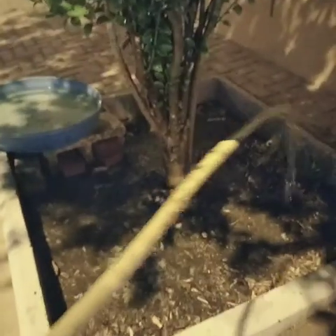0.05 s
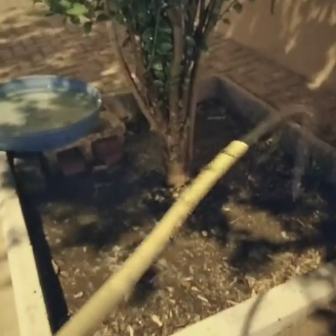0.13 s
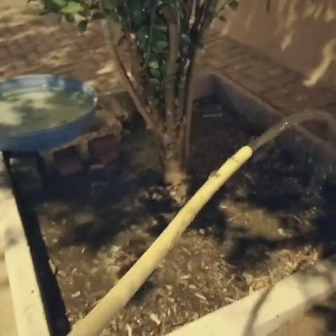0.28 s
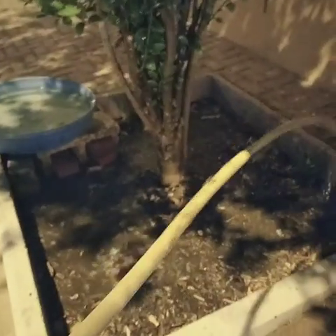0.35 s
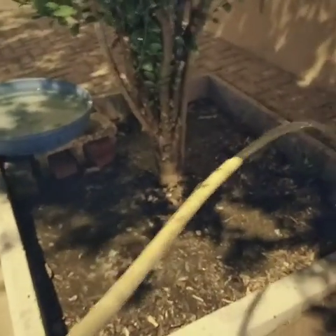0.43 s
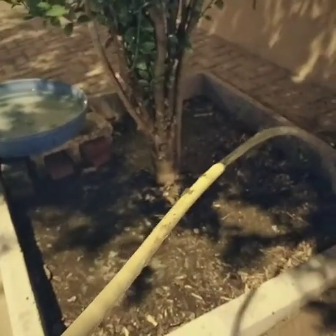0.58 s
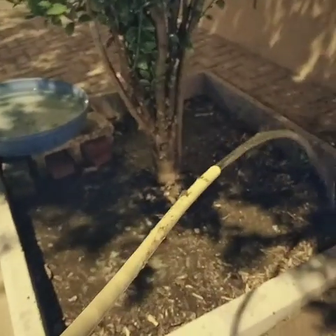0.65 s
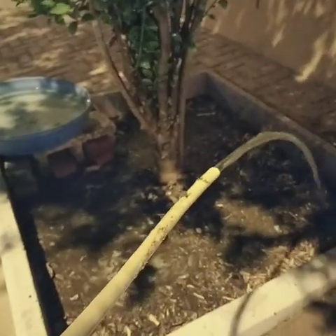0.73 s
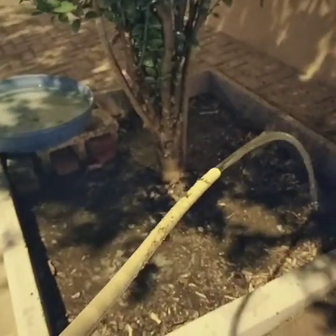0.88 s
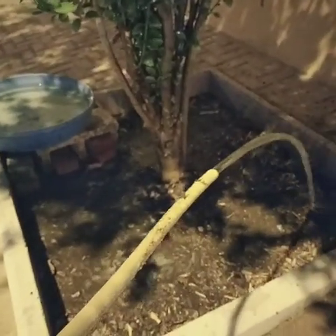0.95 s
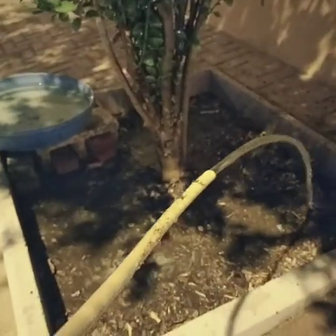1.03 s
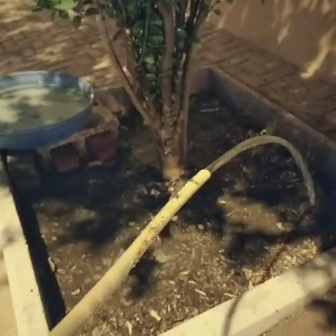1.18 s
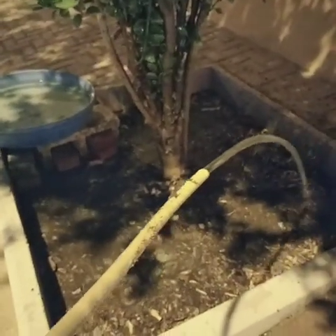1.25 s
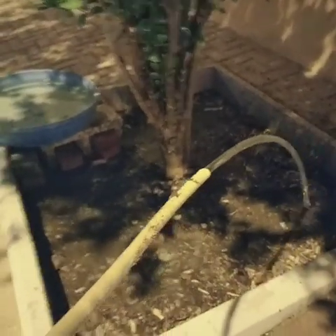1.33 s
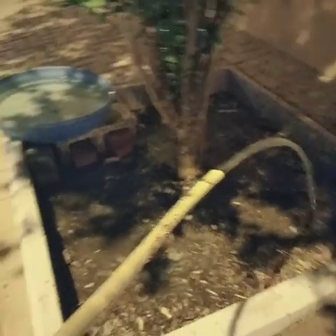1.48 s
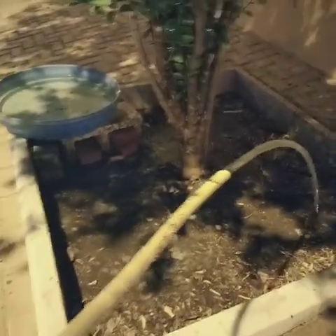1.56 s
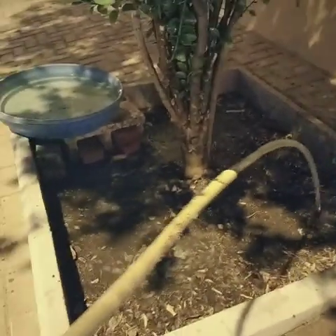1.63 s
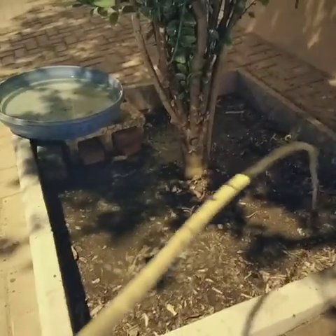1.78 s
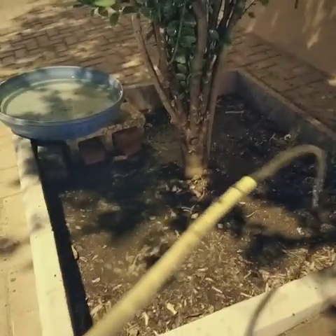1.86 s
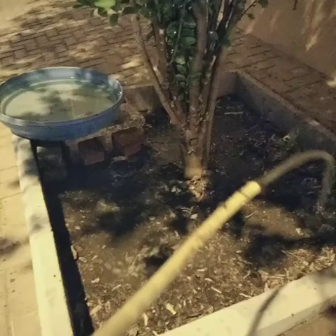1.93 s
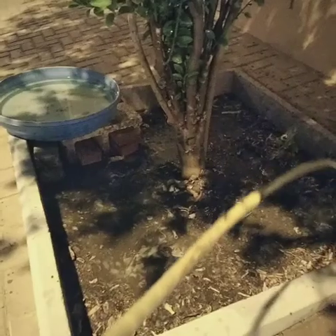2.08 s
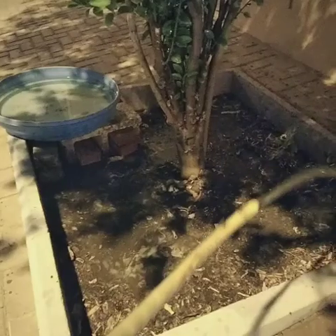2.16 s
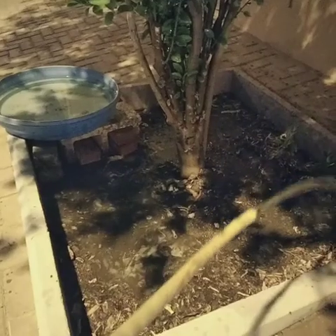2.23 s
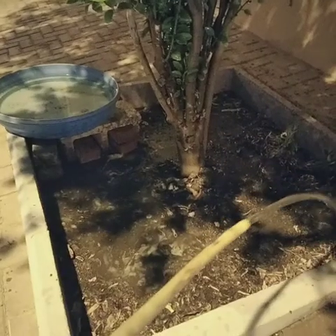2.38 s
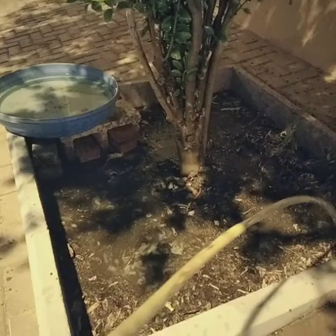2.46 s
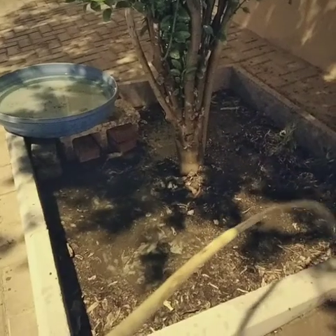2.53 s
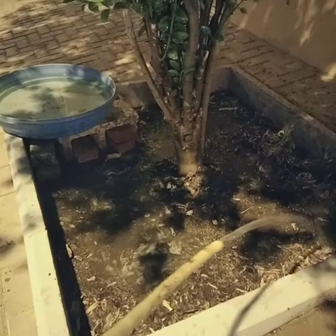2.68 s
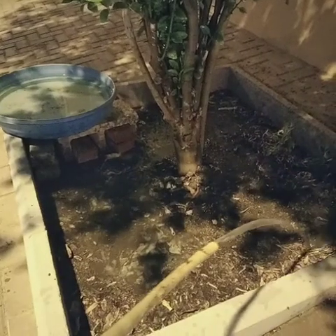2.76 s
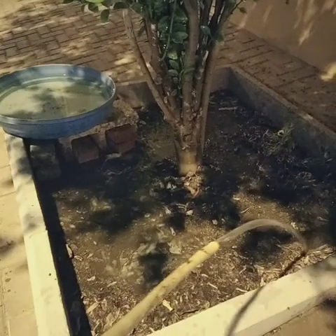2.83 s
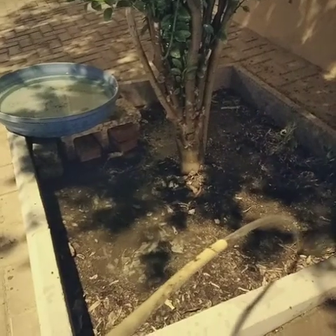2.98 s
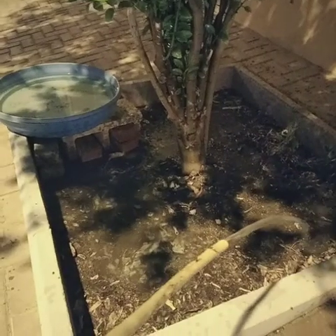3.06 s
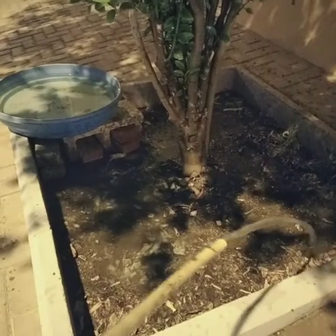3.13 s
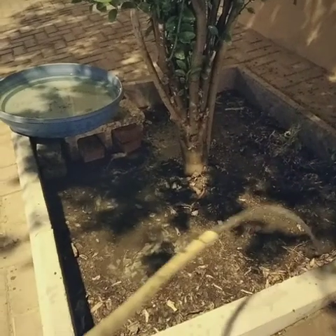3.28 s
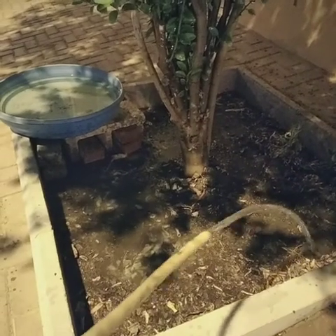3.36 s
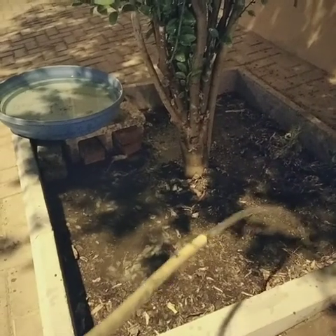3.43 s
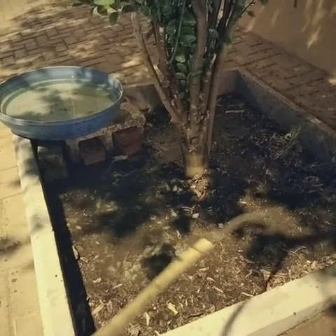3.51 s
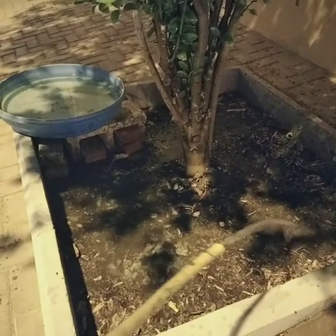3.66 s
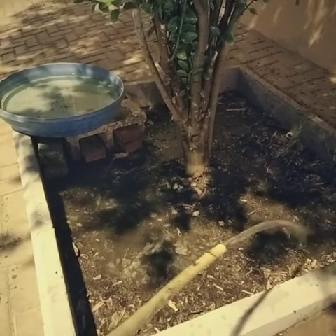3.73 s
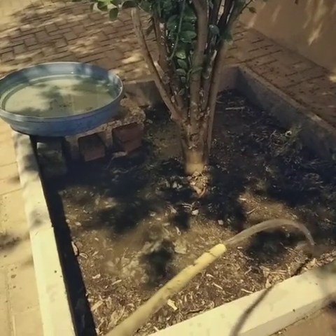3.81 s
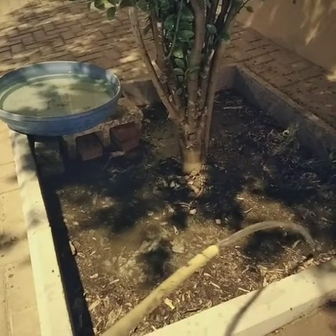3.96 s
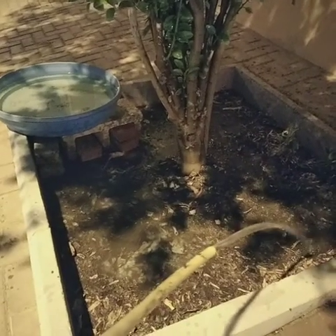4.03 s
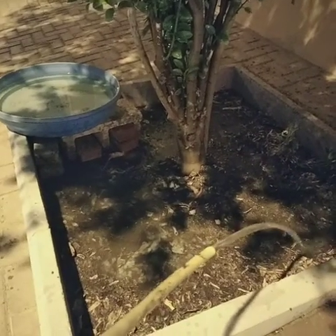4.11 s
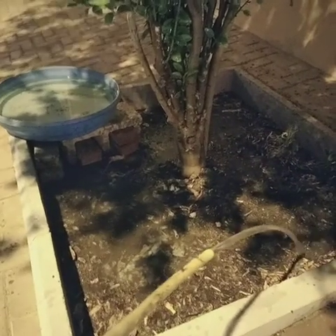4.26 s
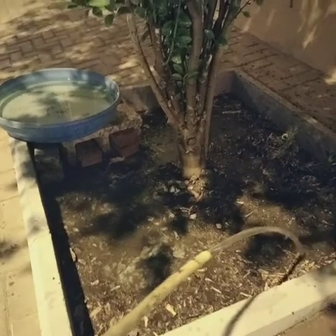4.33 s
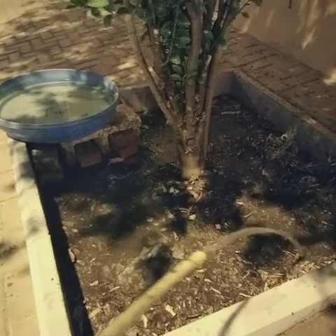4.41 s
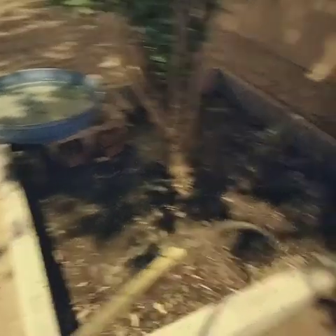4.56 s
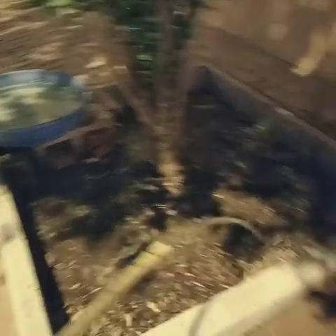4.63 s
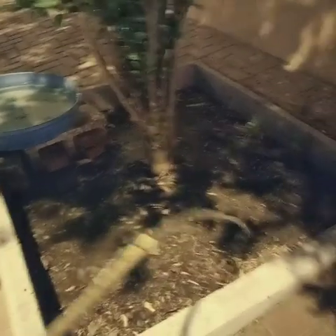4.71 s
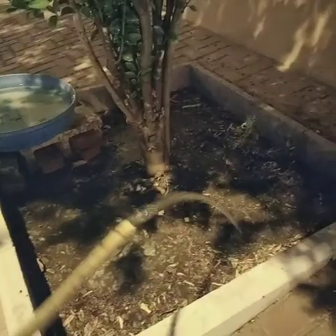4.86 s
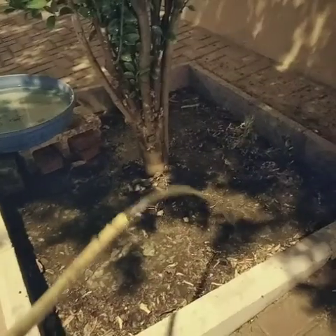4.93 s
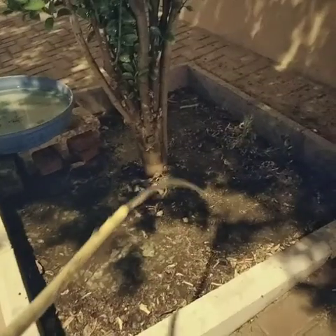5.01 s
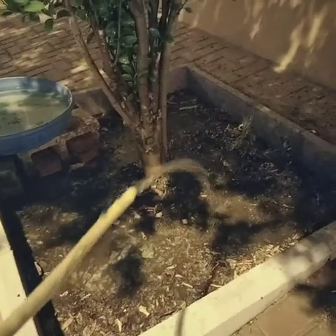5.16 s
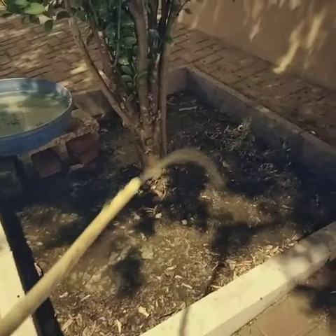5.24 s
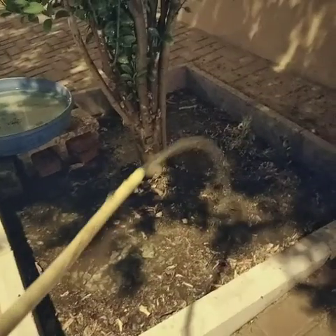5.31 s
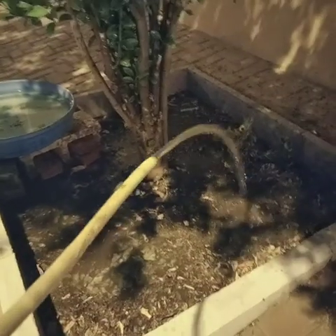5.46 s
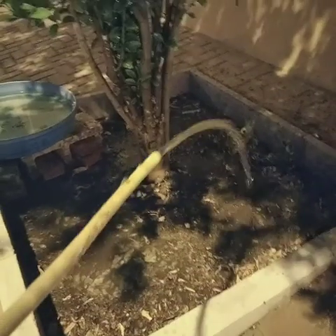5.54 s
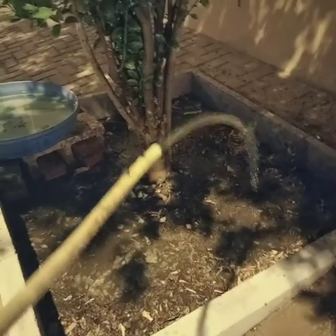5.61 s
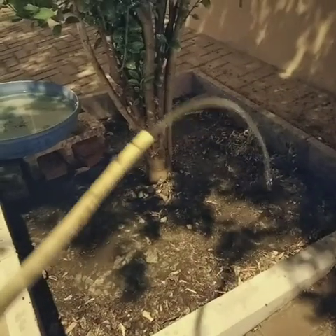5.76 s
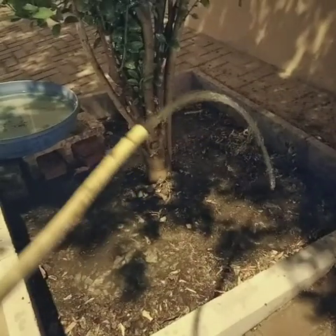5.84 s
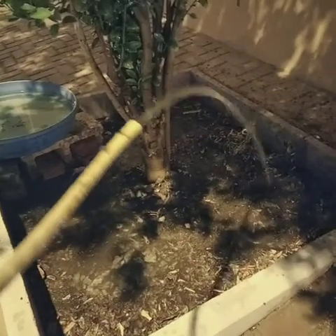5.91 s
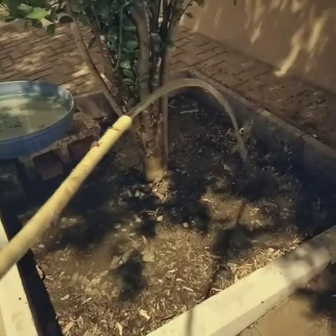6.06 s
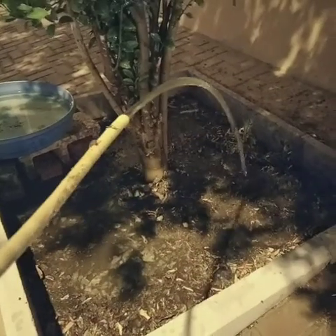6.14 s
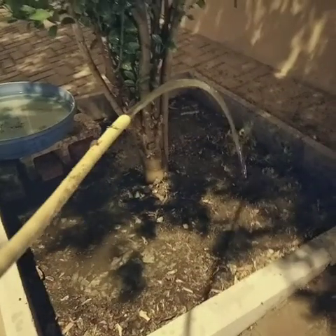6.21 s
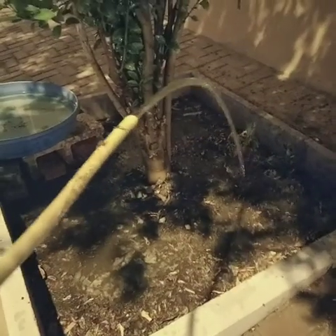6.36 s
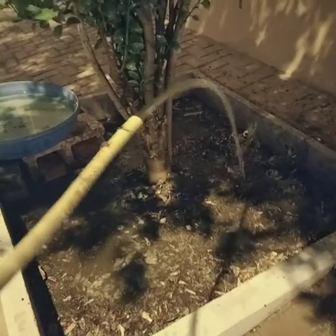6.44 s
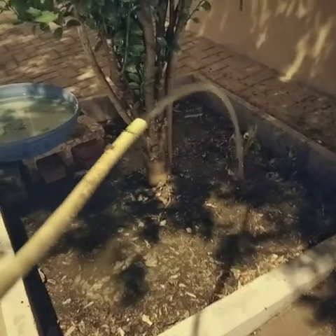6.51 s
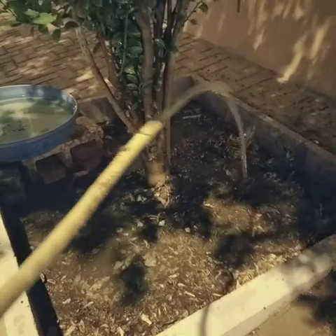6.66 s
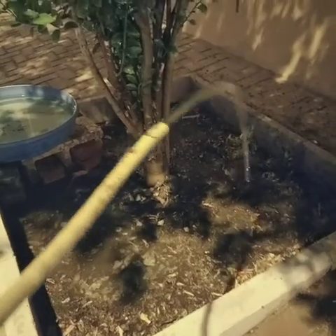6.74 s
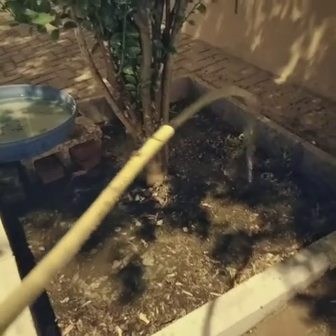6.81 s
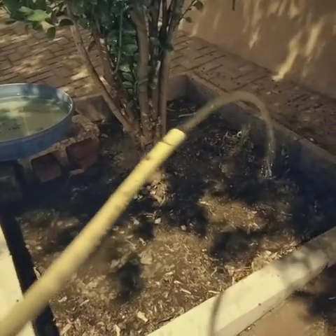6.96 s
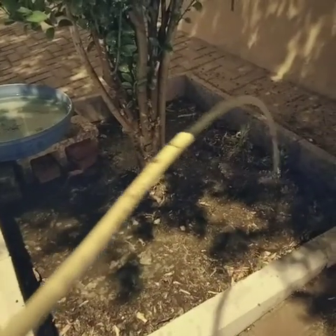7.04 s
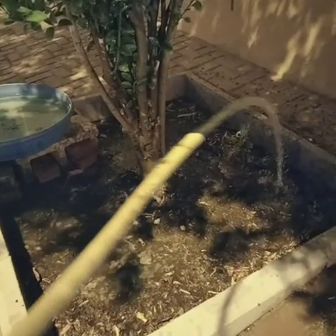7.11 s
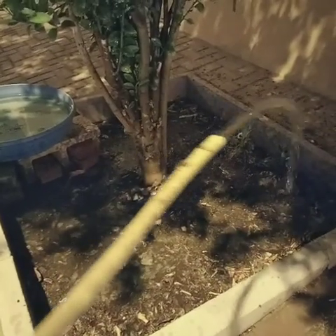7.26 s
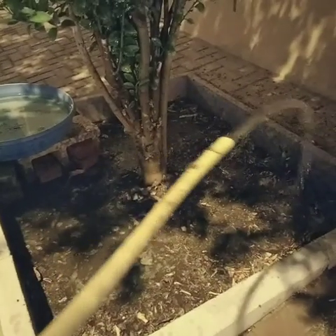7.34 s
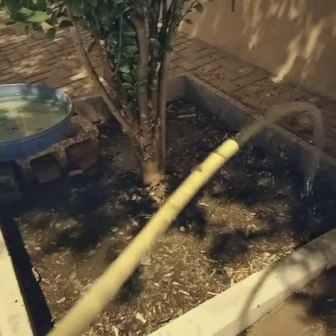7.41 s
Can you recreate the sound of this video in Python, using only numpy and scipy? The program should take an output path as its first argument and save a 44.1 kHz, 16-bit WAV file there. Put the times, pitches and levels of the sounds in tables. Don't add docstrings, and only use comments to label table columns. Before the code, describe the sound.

Close, crisp water splashing from a hose onto soil under a small tree, easing midway then surging, with bubbling plops and faint distant hum.

```python
import sys
import numpy as np
from scipy import signal
from scipy.io import wavfile
from scipy.ndimage import uniform_filter1d

SR = 44100
rng = np.random.default_rng(int(sys.argv[2]) if len(sys.argv) > 2 else 0)


def natural_amplitude(level_db):
    exponent = np.asarray(level_db, float) / 20
    return 10 ** exponent


def log_audio(samples):
    frames = np.atleast_2d(samples).T
    limited = np.clip(frames, -1, 1)
    pcm = np.round(limited * 32767).astype(np.int16)
    wavfile.write(sys.argv[1], SR, pcm)


N = 330309

# start_s, mulch_spatter_db, puddle_gurgle_db
FLOW = [(0.0, -43.5, -58.5), (0.42, -44.5, -67), (0.64, -46.5, -63.5), (0.96, -41, -66.5),
        (1.2, -42.5, -55.5), (1.75, -45.5, -60), (2.06, -43.5, -57), (2.21, -42, -65), (2.88, -47, -72),
        (3.42, -43.5, -64.5), (3.6, -45.5, -68), (4.34, -48.5, -60.5), (5.21, -41.5, -68.5),
        (5.44, -43, -68.5), (5.9, -42.5, -58.5), (6.42, -41, -63.5), (6.8, -43, -61.5),
        (7.49, -44.5, -60.5)]
# start_s, spatter_lift_db, coarse_drop_lift_db, puddle_lift_db
GUSHES = [(.2, 3.5, 7, 4), (.26, 2, 2.5, 10), (.45, 3.5, -3, -9), (0.582, 6, 3, -4), (.7, 3.5, -4, -2),
          (1.03, 3, 6, -4), (1.12, 2, 5, -3.5), (1.63, 3.5, -0.5, 4.5), (1.81, 1, 0, 1.5), (2.3, 1, 6, -8),
          (3.08, -0.5, 6, 9), (3.5, -2.5, 5.5, 3), (3.71, 6, -3, 2), (3.89, 0.5, 5, 3), (4.05, 2, -6, 3.5),
          (4.95, -2, 7, 0.5), (5.26, 0.5, 10, 5), (5.59, 2, 5, 5), (5.7, -3, 9, 7.5), (5.891, 6, 5, 1),
          (6.15, 2, 5, 2.5), (6.6, -1.5, 4, 0.5), (6.72, 0, 4, 1.5), (6.86, 2.5, 2, 3), (7.07, 7, 1.5, -7),
          (7.26, -1, -3, 2), (7.388, 2, -1.5, -13)]
# start_s, peak_db
LARGE_DROPS = [(0.1137, -27), (0.1969, -23.5), (0.2165, -32), (0.2559, -25.5), (0.3909, -28), (0.4368, -18),
               (0.4485, -32), (0.5555, -28.5), (0.5704, -34), (0.5829, -34), (0.6348, -25), (0.7016, -30),
               (0.7449, -23.5), (0.7659, -27), (0.7995, -27), (0.8835, -28), (0.8895, -29), (0.928, -32),
               (0.9761, -24), (1.0023, -23), (1.022, -27), (1.0514, -27), (1.1071, -19.5), (1.1198, -18),
               (1.1425, -28), (1.165, -21), (1.1843, -34), (1.2003, -27), (1.216, -29), (1.2432, -30),
               (1.301, -24), (1.3228, -29), (1.334, -33), (1.363, -31), (1.3749, -29), (1.4131, -20),
               (1.4483, -29), (1.5084, -20), (1.5488, -21), (1.5749, -22), (1.8015, -21.5), (1.8385, -24.5),
               (1.943, -32), (2.0847, -17.5), (2.1412, -26), (2.2559, -23.5),
               (2.3973, -31), (2.499, -27), (3.0937, -26.5), (3.2148, -25.5), (3.2215, -28), (3.2534, -32),
             (3.2673, -31), (3.2847, -25), (3.3489, -31), (3.3568, -24), (3.408, -34), (3.4459, -31),
             (3.4659, -27), (3.644, -32), (3.712, -36), (3.742, -27), (3.9342, -26.5), (4.4992, -38),
             (4.694, -28), (4.7986, -28), (4.9282, -27), (4.953, -22.5), (4.9696, -29), (5.0068, -26),
             (5.015, -26), (5.0403, -29), (5.0586, -35), (5.1378, -35), (5.1876, -30), (5.1934, -30),
               (5.2313, -28), (5.2407, -24), (5.2514, -20.5), (5.2628, -23), (5.2957, -14.5),
                (5.3056, -30), (5.3232, -22), (5.3553, -21), (5.4151, -33.5), (5.5147, -28.5),
                (5.551, -21.5), (5.5611, -20), (5.5851, -27), (5.6157, -26), (5.6563, -14.5), (5.664, -16),
                (5.679, -24), (5.6875, -28), (5.7003, -27), (5.7566, -27), (5.7747, -19), (5.8186, -26.5),
                (5.8682, -29), (5.8845, -33), (5.9074, -28), (5.9225, -31), (5.9306, -30), (5.9505, -29),
                (5.9597, -24), (6.0076, -24), (6.02, -24), (6.126, -32), (6.153, -33), (6.1776, -23),
                (6.2131, -25), (6.2302, -20), (6.246, -16), (6.303, -23.5), (6.3642, -27), (6.3845, -27),
                (6.4029, -36), (6.5753, -29), (6.6046, -25.5), (6.6614, -28), (6.8092, -34), (6.9166, -32),
                (6.9503, -26), (7.0218, -31), (7.052, -26), (7.064, -27), (7.0771, -24), (7.0983, -24),
                (7.383, -29.5), (7.4544, -23.5)]
# start_s, peak_db
DRY_LEAF_TICKS = [(0.1137, -34), (0.1968, -37), (0.4366, -31), (0.6979, -34), (1.0313, -30), (1.0511, -35),
                  (1.1873, -30), (1.413, -28), (1.5083, -32), (1.5487, -32), (1.9497, -31), (3.2842, -36),
                  (4.9249, -33), (4.9535, -33), (4.9637, -32), (5.0584, -38), (5.2415, -37), (5.2509, -24),
                  (5.5513, -37), (5.6564, -36), (5.7742, -37), (5.7855, -31), (6.0829, -36), (6.246, -31),
                  (6.6431, -30)]
# start_s, peak_db, pitch_hz
HEAVY_SLAPS = [(0.1755, -41, 5890), (0.437, -40, 5800), (0.4978, -45, 5560), (0.8864, -44, 5170),
               (1.0956, -39, 5100), (1.1078, -30.5, 5540), (1.1424, -37, 5170), (1.475, -48, 5710),
               (1.7075, -40.5, 5030), (1.943, -46, 6160), (2.0682, -45, 5430), (2.293, -37, 6440),
               (2.3953, -40.5, 5400), (2.848, -47, 5400), (3.203, -47, 5030), (3.4072, -45.5, 4970),
               (3.4471, -41, 6200), (4.531, -48, 5050), (4.9591, -40.5, 5800), (5.241, -38.5, 5030),
               (5.2952, -32.5, 5900), (5.357, -43, 4770), (5.7548, -48, 4120), (5.8845, -40, 5400),
               (5.9035, -42.5, 4070), (5.923, -43, 4240), (6.1434, -50, 4150), (6.6997, -43, 6200),
               (7.0634, -47, 4000)]
# start_s, peak_db, pitch_hz
LIGHT_SLAPS = [(0.1156, -43, 4750), (0.1374, -45, 4600), (0.1824, -31, 6340), (0.202, -33.5, 5100),
               (1.0311, -38, 5120), (1.0418, -39, 4100), (1.1842, -47, 6430), (1.2047, -42, 4610),
               (1.324, -36, 4800), (1.508, -44, 5710), (1.5487, -40, 5200), (1.5754, -37, 6300),
               (1.8016, -41, 6330), (1.8485, -40.5, 4130), (1.8791, -55, 4600), (1.8931, -47, 6230),
               (2.0233, -49, 4400), (2.0317, -31.5, 6540), (2.0514, -36, 6080), (2.1335, -42, 4570),
               (2.175, -38, 5500), (2.208, -37, 5250), (2.9963, -44.5, 4800), (3.2132, -36, 5000),
               (3.2844, -39, 6160), (3.632, -38, 6390), (3.9625, -39, 6330), (4.0427, -37.5, 6300),
               (4.308, -41, 5160), (4.5632, -43, 4720), (4.6014, -38, 6120), (4.9077, -48, 4720),
               (5.6435, -41, 4540), (5.6785, -36, 6180), (5.718, -40, 4600), (5.7962, -40, 4330),
               (5.861, -31, 6450), (6.0287, -41, 4360), (6.0725, -35, 5900), (6.0862, -29, 6150),
               (6.8094, -43, 6430), (6.984, -40.5, 4270), (7.424, -43, 4400)]
# start_s, peak_db, pitch_hz
PLOPS = [(0.023, -37, 1210), (0.271, -33, 1160), (0.624, -31, 2360), (1.042, -33, 2400), (1.205, -31, 2350),
         (1.277, -31, 2330), (1.529, -36, 860), (1.622, -33, 1760), (1.942, -38, 885), (2.053, -30, 1920),
         (3.452, -37, 2300), (3.519, -36, 1600), (3.89, -34.5, 2370), (4.074, -38, 1390),
         (4.226, -30, 2610), (4.367, -35, 1770), (5.358, -33, 2660), (5.551, -35.5, 2960),
         (5.679, -35, 2320), (5.868, -44, 2450), (5.937, -29.5, 2030), (6.029, -30, 1920),
         (6.076, -29.5, 2580), (6.143, -32.5, 2920), (6.594, -32.5, 1780), (6.679, -38, 1250),
         (6.716, -30.5, 1950), (6.841, -35.5, 866), (7.064, -28, 1470), (7.241, -35.5, 1580),
         (.555, -38.5, 368), (1.042, -37, 338), (1.712, -43, 605), (3.685, -42, 534), (4.011, -37, 530),
         (4.049, -41, 570), (4.068, -45, 640), (4.322, -39, 517), (4.469, -38.5, 564), (4.5, -44, 484),
         (6.679, -38.5, 910),
         (1.073, -31, 2780), (1.142, -37.5, 2220), (1.2535, -33.5, 2280), (1.3249, -44, 2280),
         (1.376, -35, 1790), (1.418, -37, 2300), (1.6048, -50, 1850), (2.1097, -38, 2310),
         (3.0727, -46, 1980), (3.6496, -40.5, 2290), (3.8446, -38, 1950), (4, -40, 2240),
         (4.0214, -39, 2380), (4.324, -46, 1390), (4.538, -36, 2420), (5.1186, -39.5, 2840),
         (5.2405, -50, 2400), (5.6462, -34.5, 2730), (6.0137, -32.5, 2730), (6.177, -35, 2900),
         (6.357, -38, 1960), (6.6603, -35.5, 1910), (6.7447, -32.5, 1910), (6.8942, -42, 2420),
         (6.9472, -36, 1920), (7.079, -31, 2920), (7.1917, -38, 1710), (7.2844, -39, 1810),
         (7.3203, -36, 1760), (7.3846, -38.5, 1870)]
# start_s, peak_db, pitch_hz
BURBLES = [(0.203, -42, 1870), (0.2568, -46, 2420), (0.3283, -44, 2060), (0.464, -47, 2420),
           (0.5893, -46, 2370), (0.7357, -48, 2330), (1.0212, -43, 2410), (1.1294, -50, 2340),
           (1.166, -43, 2280), (1.3503, -46, 2300), (1.483, -39, 3300), (1.509, -46, 3240),
           (1.8, -55, 2790), (1.8926, -55, 2780), (1.954, -44, 1890), (1.9944, -43, 1800),
           (2.175, -45.5, 1720), (2.1994, -53, 2540), (2.348, -55, 1960), (2.377, -53, 2490),
           (3.5073, -44, 1760), (3.756, -51, 2640), (3.9842, -43.5, 1730), (4.155, -43, 2800),
           (4.3015, -51, 2370), (4.4987, -44, 1930), (4.6194, -49, 2460), (4.8249, -46, 1980),
           (4.9712, -45, 2920), (5.1377, -50, 2380), (5.172, -47, 2380), (5.2636, -46, 2170),
           (5.627, -54, 2320), (5.657, -44, 2330), (5.703, -48, 2340), (5.754, -44, 2400),
           (5.8601, -47, 2270), (5.877, -35, 2460), (5.994, -38, 3100), (6.056, -43, 2420),
           (6.2097, -45, 2410), (6.2304, -50, 2430), (6.5766, -55, 2220), (6.8835, -41.5, 1910),
           (6.9204, -43, 1890), (7.045, -52, 2470), (7.1004, -38, 2910), (7.1666, -43, 2030)]
# start_s, peak_db, pitch_hz
GULPS = [(0.048, -50, 1300), (0.217, -41, 1100), (0.257, -51, 1140), (1.326, -47, 940), (1.433, -48, 880),
         (1.474, -47, 885), (1.852, -42.5, 950), (2.021, -40.5, 1450), (3.713, -46, 854),
         (4.469, -45, 1320), (5.04, -49, 845), (5.811, -43, 1140), (5.868, -47, 1140), (5.966, -49, 930),
         (6.947, -46, 1290)]
# frequency_hz, level_per_hz_db
SPRAY_COLOUR = [(1760, -29), (3000, -20), (3620, -28), (4260, -11), (6000, -6), (7000, -1.5), (7890, 5),
                (8820, 5.5), (9600, 1), (10600, -0.5), (11600, -5), (13500, -8), (16500, -9)]
# frequency_hz, level_per_hz_db
PUDDLE_COLOUR = [(250, -25), (500, -6), (1000, -5.5), (2000, -3), (3000, -8.5), (4500, -8.5), (8000, -22)]
# pitch_hz, width_hz, level_db
HOLLOW = [(885, 82, 0.5), (1345, 160, 0.5), (1760, 68, 3), (1920, 39, 8), (2360, 117, 9), (2780, 53, 8),
          (3330, 190, 11)]
# start_s, commonest_pocket_hz, ground_bounce_notch_hz
LANDING = [(0, 1490, 3640), (.3, 1300, 3660), (.7, 2420, 3620), (1.15, 2350, 3800), (1.4, 2350, 3600),
           (1.5, 900, 3520), (1.62, 1900, 3500), (2.1, 1920, 3500), (3, 1730, 3800), (3.9, 2300, 3700),
           (4.4, 1400, 3540), (4.6, 2350, 3450), (5.4, 2440, 3300), (6.1, 2360, 3030), (6.6, 1900, 2780),
           (7.0, 1900, 3120), (7.2, 1760, 3300), (7.49, 1800, 3650)]
# start_s, port_resonance_factor, finest_mist_db, shoulder_at_5600_hz_db
AIM = [(0, 1.034, 1, -1), (.6, 1.063, 0, -4.5), (1.1, 1.032, 0, -4.5), (1.7, 1.033, 0, 0.5),
       (2.3, 1.042, -1, -1), (2.9, 1.027, 0, 0), (3.4, 1.03, -0.5, -1), (3.8, 1.04, 1, 0),
       (4.1, 1.007, -3, -1), (4.5, 1.05, -1, -1.5), (4.9, 1.064, 0, -2.5), (5.4, 1.038, 0, -6.5),
       (5.896, 1.01, -0.5, -9), (6.4, 1.037, -1.5, -8), (6.9, 1.018, 0.5, -5), (7.49, 1.046, 2, -4)]
# start_s, dip_hz, dip_db, top_air_db, ground_notch_db
SHADE = [(0, 12300, -4, 6, -19), (.7, 11350, -8, 0, 5), (1.25, 11300, -10, -1, -0.5),
         (1.75, 12100, -6, 3, -13), (2.3, 11800, -8, 4, -9), (2.8, 12000, -3, 5, -2),
         (3.3, 13300, 0, 5, -5), (4.2, 13200, 0, 6, -12), (4.7, 11500, -6, 4, -12),
         (5.2, 11500, -8, -3, -7), (5.7, 10700, -6.5, -1, -5), (6.5, 11060, -8, -2, -1.5),
         (7.49, 11150, -6, 0, -2.5)]
# delay_s, level_db
KERB = [
    (.00210, -42.5),
    (.0043, -20),
]
# frequency_hz, level_per_hz_db
RUMBLE_COLOUR = [(12, -37), (20, 5), (103, -0.5), (201, -9), (262, -9.5), (408, -13), (456, -18.5),
                 (1320, -29.5), (1580, -37), (2510, -36), (4000, -41), (5200, -55), (8800, -120)]
# pitch_hz, width_hz, level_db
HUM = [
    (101.5, 9.2, -66.5),
    (147, 6.7, -70),
    (199.8, 5.7, -77.5),
    (299.3, 2.6, -78),
]


def evened(x):
    return x / np.sqrt(np.mean(x ** 2) + 1e-20)


def colour(x, points):
    f, db = np.transpose(points)
    hz = abs(np.fft.fftfreq(4096, 1 / SR))
    log_gain = np.log(natural_amplitude(np.interp(np.log(hz + 1), np.log(f), db)))
    minimum_phase = np.exp(np.conj(signal.hilbert(log_gain)))
    taps = np.fft.ifft(minimum_phase).real[:2048]
    return signal.oaconvolve(x, taps)[:len(x)]


def band(x, lo_hz, hi_hz):
    sos = signal.butter(2, [lo_hz, min(hi_hz, 0.45 * SR)], "band", fs=SR, output="sos")
    return signal.sosfilt(sos, x)


def drift(hz):
    step = 64
    pole = np.exp(-2 * np.pi * hz * step / SR)
    slow = signal.lfilter([1], np.poly([pole] * 2), rng.standard_normal(N // step + 2))
    return np.interp(np.arange(N) / step, np.arange(len(slow)), evened(slow))


def follow(t, table):
    s, *columns = np.transpose(table)
    return [np.interp(t, s, column) for column in columns]


def add(mix, s, sound):
    part = mix[round(s * SR):][:len(sound)]
    part += sound[:len(part)]


def peaked(x):
    return x / abs(x).max()


def flow():
    t = np.arange(N) / SR
    spray_db, puddle_db = follow(t, FLOW)
    coarse_db = -15 + 0.5 * (puddle_db - spray_db + 19)
    levels = np.array([spray_db, coarse_db, puddle_db])
    rise_s, fall_s = 0.024, 0.057
    for s, *lift_db in GUSHES:
        near = slice(max(round((s - 0.3) * SR), 0), round((s + 0.5) * SR))
        from_peak = t[near] - s
        hump = np.exp(-abs(from_peak) / np.where(from_peak < 0, rise_s, fall_s))
        levels[:, near] += np.outer(lift_db, hump)
    return levels


def breakup(listed):
    blobs_per_s, shower_t60_s, rest = 75, 0.041, 0.33
    rate = blobs_per_s * np.exp(0.5 * drift(blobs_per_s))
    lands = np.diff(np.floor(np.cumsum(rate) / SR), prepend=0)
    lands = lands * natural_amplitude(2.5 * rng.standard_normal(N))
    for s, db in listed:
        add(lands, s, natural_amplitude([0.5 * (db + 25.5)]))
    shower = signal.lfilter([1], [1, -natural_amplitude(-60 / (shower_t60_s * SR))], lands)
    return rest + evened(shower)


def bubble(hz, cycles, glide):
    t = np.arange(900) / SR
    age = t * hz / cycles
    climb = 1 + glide * np.minimum(age, 3)
    return (1 - np.exp(-t * hz * 3)) * np.exp(-age) * np.sin(2 * np.pi * hz * t * climb)


def drops(shower, per_s, spread_db, lo_hz, hi_hz, cycles, count=10):
    falls = rng.random(N) < per_s * shower / SR
    spread = natural_amplitude(spread_db * np.minimum(rng.exponential(1, N), 2.8))
    size = falls * shower * spread * rng.choice([-1, 1], N)
    kind = rng.integers(0, count, N)
    out = np.zeros(N)
    for k, hz in enumerate(np.geomspace(lo_hz, hi_hz, count)):
        ring = bubble(hz, cycles, 0.0926)
        ring = np.sqrt(hz) * ring / np.linalg.norm(ring)
        out += signal.oaconvolve(size * (kind == k), ring)[:N]
    return out / np.sqrt(abs(uniform_filter1d(out ** 2, 4000)) + 1e-6)


def spatter(shower, spray_db, coarse_db):
    fine = drops(shower, per_s=3000, spread_db=9.0, lo_hz=4800, hi_hz=17000, cycles=1.64)
    ticks = drops(shower[::-1] ** 0.49, per_s=79, spread_db=10.0, lo_hz=11500, hi_hz=15000, cycles=3.3, count=4)
    hiss = shower ** 0.51 * rng.standard_normal(N)
    fine = evened(colour(fine + 0.42 * ticks + 1.18 * hiss, SPRAY_COLOUR))
    coarse = drops(shower ** 0.51, per_s=900, spread_db=3.5, lo_hz=3800, hi_hz=5800, cycles=2.8)
    return natural_amplitude(spray_db - 1.0) * (fine + natural_amplitude(coarse_db + 1.0) * coarse)


def splats(listed):
    t, out = np.arange(500) / SR, np.zeros(N)
    spit = rng.standard_normal((len(listed), len(t)))
    snaps = spit * (np.exp(-t / 0.00067) + 0.052 * np.exp(-t / 0.0007))
    crisp, body, air = band(snaps, 7520, 10170), band(snaps, 4150, 4980), band(snaps, 10000, 22000)
    for i, (s, db) in enumerate(listed):
        sound = natural_amplitude(db + 0.5) * peaked(crisp[i])
        sound += natural_amplitude(db - 24.5) * peaked(body[i])
        sound += natural_amplitude(db - 16) * peaked(air[i])
        add(out, s + 0.0008, sound)
    return out


def leaf_ticks():
    t, out = np.arange(500) / SR, np.zeros(N)
    noise = rng.standard_normal((len(DRY_LEAF_TICKS), len(t)))
    ticks = band(noise * np.exp(-t / 0.00092), 8300, 15500)
    for (s, db), tick in zip(DRY_LEAF_TICKS, ticks):
        add(out, s + 0.0004, natural_amplitude(db + 4.0) * peaked(tick))
    return out


def leaf_slaps():
    out = np.zeros(N)
    for slaps, gain_db in [(HEAVY_SLAPS, 9.5), (LIGHT_SLAPS, 3.5)]:
        for s, db, hz in slaps:
            add(out, s + 0.00037, natural_amplitude(db + gain_db) * peaked(bubble(hz, 4.3, 0.011)))
    return out


def gurgle(shower, puddle_db):
    small = drops(shower ** 0.44, per_s=1100, spread_db=4.0, lo_hz=439.6, hi_hz=3450, cycles=4.46, count=18)
    wash = 0.5 * np.sqrt(abs(shower)) * rng.standard_normal(N)
    return natural_amplitude(puddle_db - 4.5) * evened(colour(small + wash, PUDDLE_COLOUR))


def plops():
    out = np.zeros(N)
    faint = [(s, db + 4.5, hz) for s, db, hz in BURBLES + GULPS]
    pockets = PLOPS + faint
    fade = np.exp(-np.arange(900) / SR / 0.0089)
    ticks = band(rng.standard_normal((len(pockets), 900)) * fade, 480, 3500)
    for (s, db, hz), tick in zip(pockets, ticks):
        ring = bubble(hz, 1.78, 0.0077)
        add(out, s, natural_amplitude(db - 10.5) * (peaked(ring) + 0.37 * peaked(tick)))
    return out


def hollow(x):
    pocket_hz, _ = follow(np.arange(N) / SR, LANDING)
    rings = np.zeros(N)
    for hz, width_hz, db in HOLLOW:
        near_db = 2.5 * np.exp(-(np.log(hz / pocket_hz) / 0.16) ** 2)
        ring = signal.lfilter(*signal.iirpeak(hz, hz / width_hz, SR), x)
        rings += natural_amplitude(db + near_db + 2.5 * drift(12)) * ring
    return x + 0.5 * rings


def aimed(x):
    hz, t, z = signal.stft(x, SR, nperseg=256, noverlap=128)
    hz = hz[:, None] + 1
    port_factor, mist_db, shoulder_db = follow(t, AIM)
    pocket_hz, notch_hz = follow(t, LANDING)
    dip_hz, dip_db, air_db, depth_db = follow(t, SHADE)
    wander = drift(16)[np.minimum((t * SR).astype(int), N - 1)]
    notch_hz = notch_hz * (1 + 0.051 * wander)
    f, db = np.transpose(SPRAY_COLOUR[3:])
    slid = np.log(hz) - np.log(port_factor) * (1 + 0.12 * (hz > 9500))
    change_db = np.interp(slid, np.log(f), db) - np.interp(np.log(hz), np.log(f), db)
    change_db += mist_db * np.clip((hz - 11000) / 1500, 0, 1)
    change_db += shoulder_db * np.exp(-((hz - 5600) / 900) ** 2)
    change_db += 1.2 * np.exp(-(np.log(hz / pocket_hz) / 0.1) ** 2) - 1.21 * (hz < 2600)
    change_db += dip_db * np.exp(-((hz - dip_hz) / 600) ** 2)
    change_db += air_db * np.clip((hz - 13800) / 1400, 0, 1)
    change_db += depth_db * np.exp(-((hz - notch_hz) / 230) ** 2)
    return signal.istft(z * natural_amplitude(change_db), SR, nperseg=256, noverlap=128)[1][:N]


def bed(x):
    tail_db, t60_s, turns_per_s, count = -9, 0.13, 9, 5
    dull, out = band(x, 110, 7200), x.copy()
    for s, db in KERB:
        add(out, s, natural_amplitude(db) * dull)
    t = np.arange(4000) / SR
    tails = rng.standard_normal((count, len(t))) * natural_amplitude(-60 * t / t60_s) * (t > 0.0006)
    turn = np.arange(N) / SR * turns_per_s % count
    for k, tail in enumerate(tails):
        away = abs((turn - k + count / 2) % count - count / 2)
        share = np.cos(np.pi / 2 * np.minimum(away, 1))
        out += natural_amplitude(tail_db) * signal.oaconvolve(share * x, tail / np.linalg.norm(tail))[:N]
    return out


def town():
    out = natural_amplitude(-59) * evened(colour(rng.standard_normal(N), RUMBLE_COLOUR))
    for hz, width_hz, db in HUM:
        waver = 1.05 + drift(width_hz / 2) + 1j * drift(width_hz / 2)
        line = waver * np.exp(2j * np.pi * hz * np.arange(N) / SR)
        out += natural_amplitude(db) * evened(line.real)
    return out


def scene():
    listed = LARGE_DROPS
    shower = breakup(listed)
    spray_db, coarse_db, puddle_db = flow()
    shower = shower ** np.clip(1.5 + 0.49 * (spray_db + 41), 0.3, 1.15)
    high = spatter(shower, spray_db, coarse_db) + splats(listed) + leaf_ticks() + leaf_slaps()
    low = hollow(gurgle(shower, puddle_db) + plops())
    return (bed(aimed(high + low)) + town())[None]


def top_cut(x):
    return signal.sosfilt(signal.butter(12, 15800, fs=SR, output="sos"), x)


def record(dry):
    low_pass = signal.firwin(601, 15920, fs=SR)
    thin = signal.oaconvolve(dry, low_pass[None], "same")
    return top_cut(thin + natural_amplitude(-26.5) * dry)


dry = scene()
out = record(dry)
log_audio(out)
```